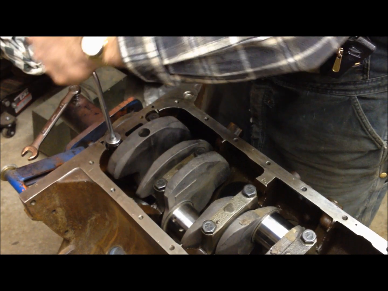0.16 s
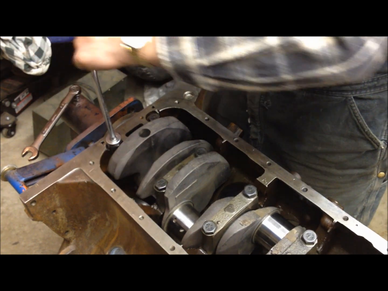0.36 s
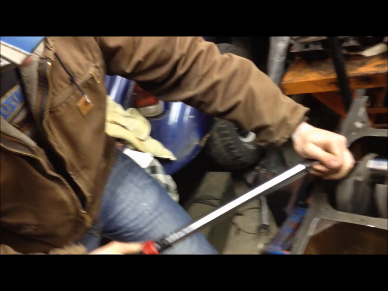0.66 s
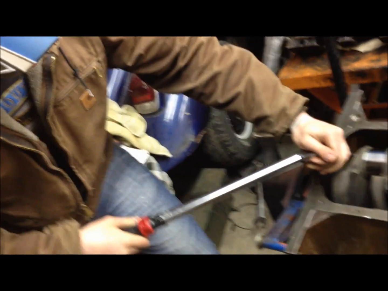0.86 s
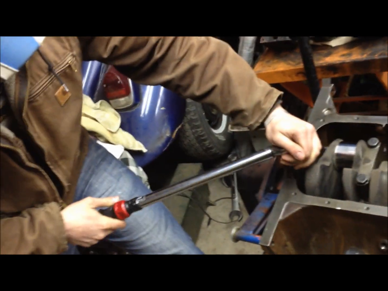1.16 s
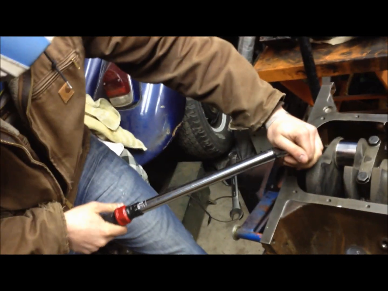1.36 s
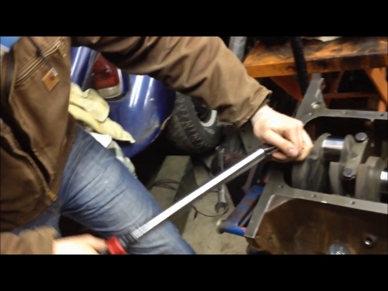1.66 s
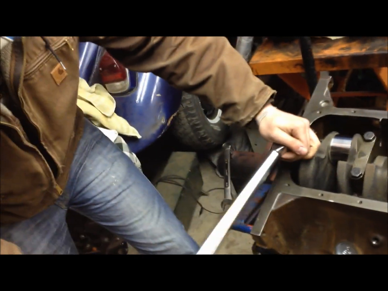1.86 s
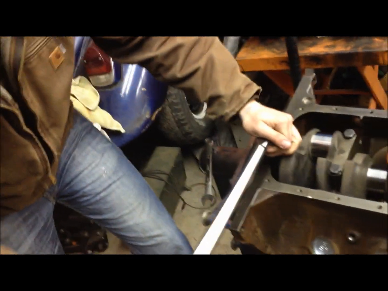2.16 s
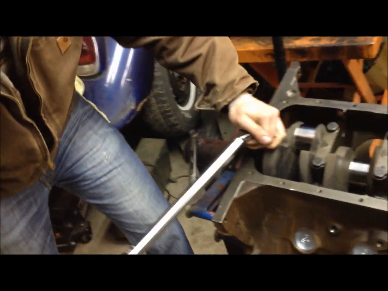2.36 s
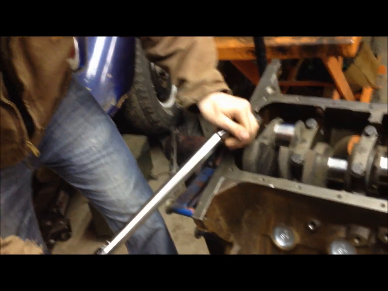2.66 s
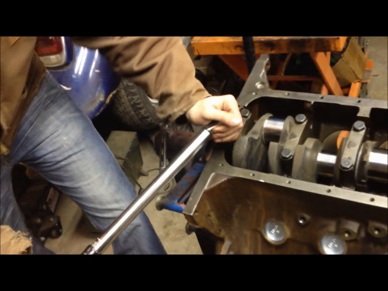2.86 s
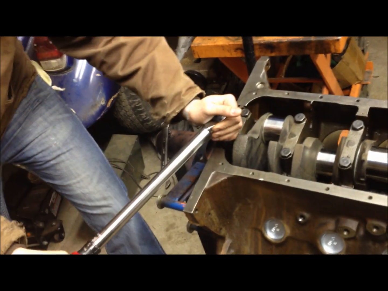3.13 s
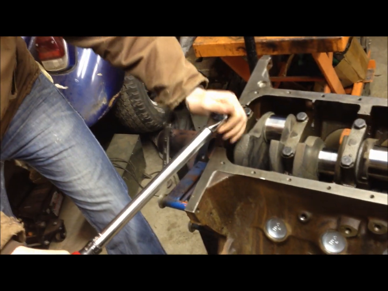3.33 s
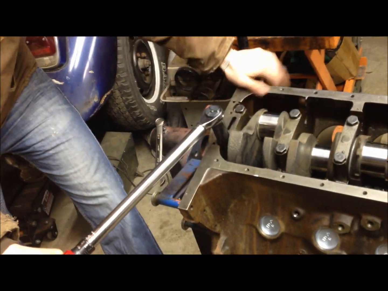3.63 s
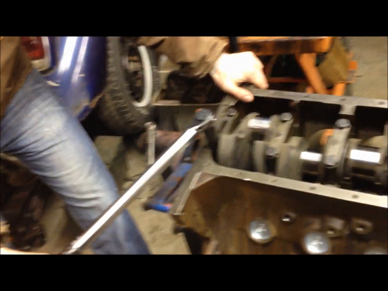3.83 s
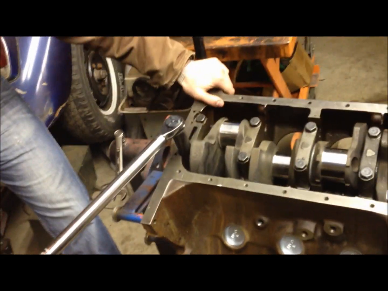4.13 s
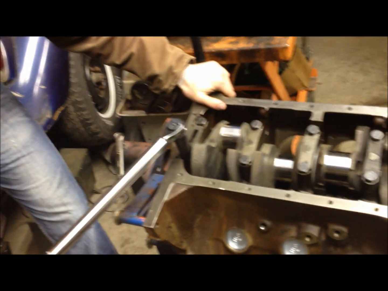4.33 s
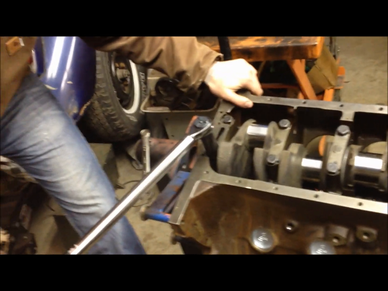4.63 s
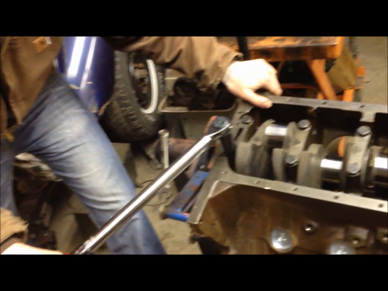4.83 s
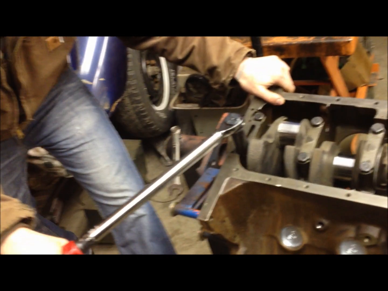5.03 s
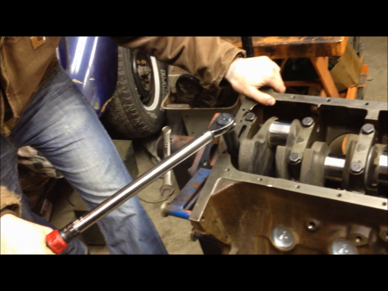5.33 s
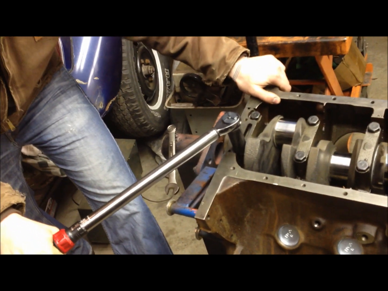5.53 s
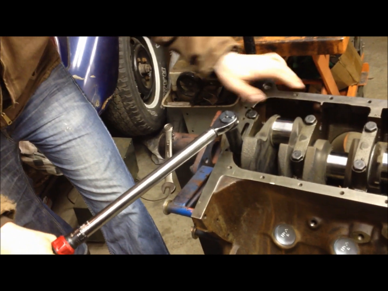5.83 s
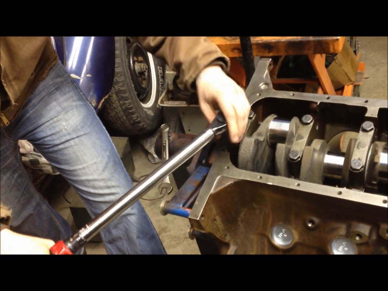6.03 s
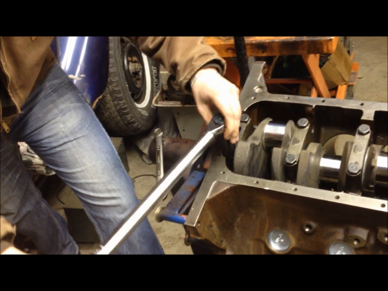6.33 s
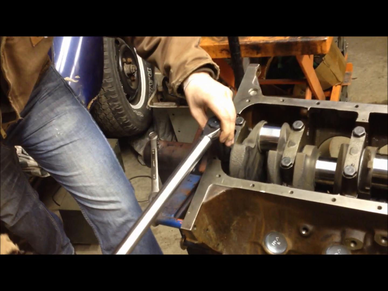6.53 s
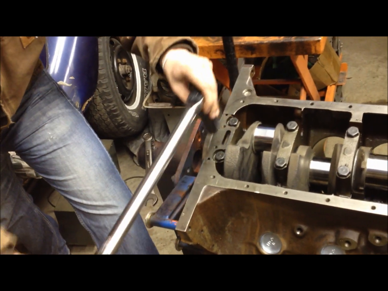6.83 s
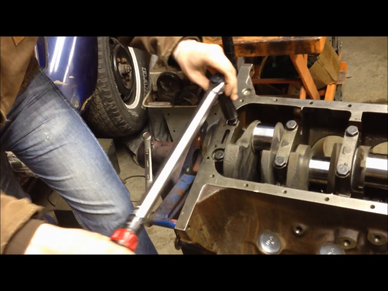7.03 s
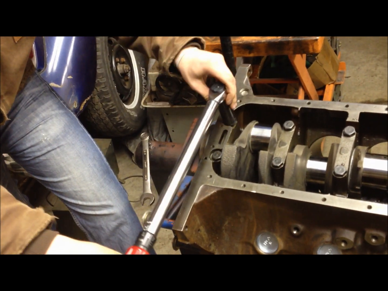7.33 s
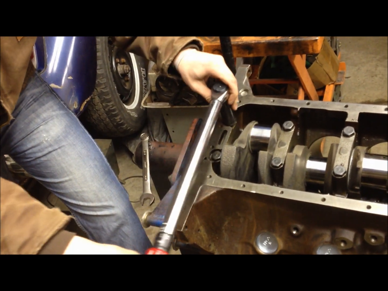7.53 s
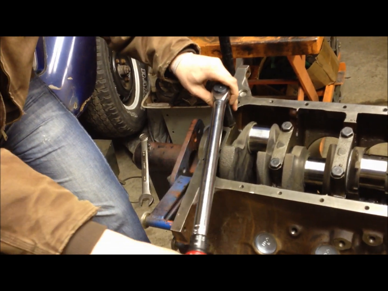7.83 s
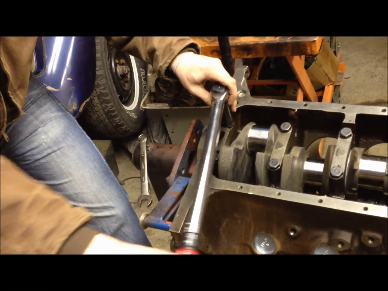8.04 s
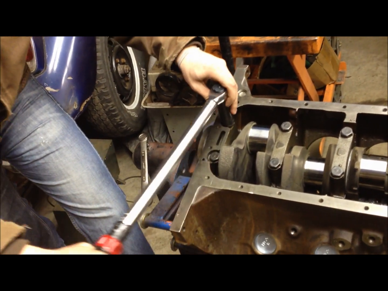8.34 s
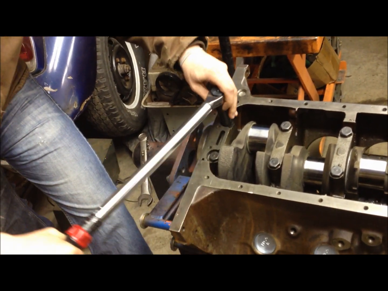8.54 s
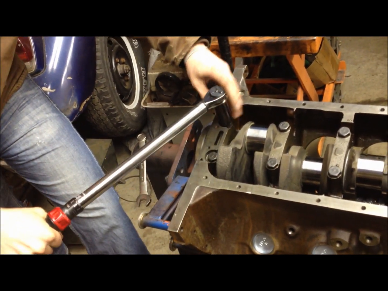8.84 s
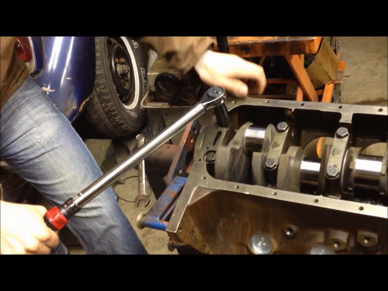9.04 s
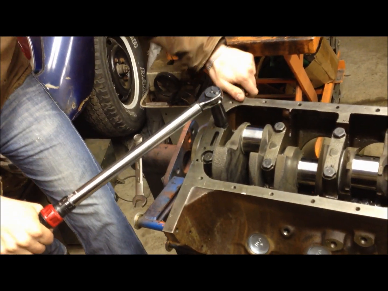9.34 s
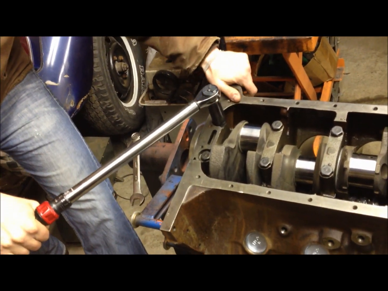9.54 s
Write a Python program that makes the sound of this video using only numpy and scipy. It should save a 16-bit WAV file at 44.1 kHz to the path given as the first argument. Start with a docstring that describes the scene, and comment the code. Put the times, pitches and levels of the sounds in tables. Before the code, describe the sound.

In a small garage, a torque wrench ratchets and knocks on a bare engine block, clicks loudly with a short ring, then clanks loose.

```python
"""Torque wrench on an engine block

A click-type torque wrench tightens bolts on a bare engine block in a small garage. Its blows are short
forces that excite damped modes, followed by scattered echoes and a diffuse tail: ratchet ticks, socket
clanks, dull knocks, and the sharp click of the wrench breaking over and snapping back. Work clothes
swish as noise that follows their speed. A rumble stops early; shaped air noise and sine hum follow it."""
import sys
import numpy as np
from scipy import signal
from scipy.fft import rfft, irfft
from scipy.io import wavfile
from scipy.ndimage import uniform_filter1d

SR = 44100
rng = np.random.default_rng(int(sys.argv[2]) if len(sys.argv) > 2 else 0)


def persist_wave(psi):
    """Save psi, clipped to +-1, as 16-bit WAV."""
    counts = np.round(np.clip(psi, -1, 1) * 32767).astype(np.int16)
    wavfile.write(sys.argv[1], SR, np.atleast_2d(counts).T)


N = 427329

# Rumble at the start, spectral shape: (f/Hz, level/dB)
RUMBLE_SPECTRUM = [(24, -50), (40, -33), (64, -24), (108, -1.5), (200, 2.5), (329, 0), (454, -6.5),
                   (1610, -15), (4680, -28.5), (11400, -33), (13600, -33), (15000, -29)]
# Still air, spectral shape: (f/Hz, level/dB)
AIR_SPECTRUM = [(30, -32.5), (80, -26.5), (160, -8.5), (300, -10.5), (600, -14.5), (1200, -14), (2000, -17),
                (3300, -19.5), (4500, -22.5), (7300, -20.5), (9500, -29), (13500, -26.5), (15500, -27)]
# Mains hum partials: (f/Hz, rms level/dB)
HUM_PARTIALS = [(120, -95), (241, -77.5), (360.5, -73.5), (480, -81), (721, -91.5)]
RUMBLE_DB, AIR_DB = -54.5, -65  # rms levels before the microphone
RUMBLE_END_S = .785

# Decay of the garage: (f/Hz, t60/s)
GARAGE_T60 = [(150, 0.42), (400, 0.74), (1040, 0.72), (2760, 0.72), (7280, 0.56), (13000, 0.27)]
# Strength of the garage's diffuse tail: (f/Hz, level/dB)
WALL_TONE = [(100, 2), (350, -1), (650, -1.5), (1000, 1.5), (2000, -6.5), (3300, -2.5), (5500, -5),
             (7500, -4), (13000, -2)]

# Ratchet pawl dropping over single teeth:
# (t/s, strength/dB, treble/dB, top/dB, resonance favoured by the tooth f/Hz)
PAWL_DROPS = [(.205, -31.5, 1, 23, 13500), (1.4814, -17, 1.5, 10, 5600), (1.7992, -5.5, 0.5, 7, 5380),
              (1.8728, -8.5, 2.5, 9.5, 4600), (1.9375, -0.5, -8, 5.5, 6100),
              (1.9986, -0.5, -3.5, 9.5, 5340), (2.0691, 0, 1, 6.5, 7540), (2.351, -33, 6, -7, 6000),
              (2.43, -19, -5, -16, 5000), (2.7136, 4.5, -1.5, -1, 3280), (3.205, -13.5, -7, 0, 7700),
              (3.363, -24, -2, 9, 6500), (6.244, -32, -1, 20, 7000), (6.3065, -18.5, -4.5, 9, 6890),
              (6.7746, 0, -3.5, 12.5, 5980)]
# Socket and wrench head against bolts and block:
# (t/s, strength/dB, bass/dB, treble/dB, top/dB, resonance favoured by the contact f/Hz, chatter time/s)
SOCKET_BLOWS = [(.9518, -10, 21.5, 2, 3.5, 900, 0.0039), (1.1133, -18, 1, -13, -25, 2300, 0.0067),
                (1.3257, -9.5, 4, -11.5, -49, 3100, 0.0075), (1.5301, 3, 6.5, -17, -9, 1320, 0.0018),
                (6.655, -13, -3, -35, -36, 1850, 0.022), (6.675, -12, 0, -14, -14, 1700, 0.015),
                (6.695, 3.5, -9, -6, -23, 2200, 0.0052), (7.246, 14.5, -9.5, -7, -5, 2400, 0.0058),
                (7.3453, 2.5, 3, 0.5, -1.5, 1790, .008), (7.403, -3.5, 5, -2.5, 4.5, 2420, 0.018),
                (7.456, -5.5, -10, -10, -14, 2177, 0.0094), (7.8738, -9.5, -3, -6, -54, 2120, 0.006),
                (8.6095, -3, -2, -13, -7, 2000, 0.0077), (8.6209, 16.5, 3, 0, 6, 3190, 0.0034)]
# Dull knocks against the block and its stand:
# (t/s, strength/dB, bass/dB, treble/dB, favoured resonance f/Hz, chatter time/s)
KNOCK_BLOWS = [(3.226, 12.5, -5, -12, 550, 0.0018), (3.231, 15.5, -11, -1.5, 860, 0.02),
               (3.32, 1.5, -9, -4, 940, .01), (4.106, -11, -10.5, -28, 900, 0.0038),
               (4.187, -20, -3.5, -14, 650, 0.0024), (4.2115, -4, -24, 3, 1770, .0016),
               (4.523, -14, -7.5, -27, 644, 0.01)]
# The wrench breaking over, then snapping back:
# (t/s, strength/dB, bass/dB, treble/dB, top/dB, resonance favoured by the contact f/Hz, chatter time/s)
WRENCH_BLOWS = [(5.388, 18.5, -2, 3, 9, 5760, .0017), (5.7533, 13, -5, -0.5, -5, 2070, 0.0031)]

# Colour of the crowded, quickly damped modes of each part: (f/Hz, level/dB)
PAWL_COLOUR = [(70, -39), (300, -29), (1200, -19.5), (1900, -8.5), (3300, -16), (4500, -5), (5600, -3.5),
               (7300, -8), (9500, -19), (14000, -27)]
SOCKET_COLOUR = [(50, -37.5), (100, -33.5), (150, -16.5), (250, -18), (400, -13), (600, -14), (1100, -2),
                 (1550, -0.5), (2000, 1), (3000, -0.5), (3800, -3), (4600, -7), (6500, -3.5), (7700, -6.5),
                 (8700, -15.5), (11500, -20), (14000, -20.5)]
KNOCK_COLOUR = [(60, -21), (120, -13), (200, 6.5), (330, 5), (550, 5), (900, -2.5), (1400, -7),
                (2200, -9.5), (3500, -18), (7000, -23.5), (13000, -43)]
WRENCH_COLOUR = [(90, -32), (250, -18.5), (400, -13.5), (620, -24.5), (850, -10.5), (1050, -11.5),
                 (1500, -14), (2200, -4.5), (3300, -7), (4600, -8.5), (5600, -7), (7250, -10),
                 (8300, -13.5), (10600, -20), (13000, -19.5)]
# Clear modes of each part that ring on: (f/Hz, relative level/dB, t60/s)
PAWL_RINGING = [(4950, -13, .2), (5400, 0, .01), (5980, -15, .25), (7300, -15, .15), (7620, -21, .25)]
SOCKET_RINGING = [(145, -24, .5), (255, -19, .45), (953, -22, .55), (1120, -15, .45), (1160, -9, .3),
                  (1239, -12, .3), (1392, -16, .4), (1900, -12, .5), (2007, -4, .22), (2526, -4, .15),
                  (2835, -10, .4), (2901, 7.5, .15), (3220, -12, .45), (3290, -10, .6), (3366, -9, .45),
                  (3512, -9, .35), (3788, -6, .25), (3942, -8, .2), (7779, -21, .3)]
KNOCK_RINGING = [(245, 0, .3), (298, 8, .3), (565, -2, .25), (649, 2, .3), (790, -6, .4), (960, -4, .45),
                 (1385, -11, .45)]
WRENCH_RINGING = [(955, -17, .45), (1020, -13.5, .5), (1098, -13, .5), (1180, -17, .4), (2150, 11, .022),
                  (2630, 2, .03), (3330, -19, .6), (5445, 11, .011), (5655, 12, .011), (7251, 14, .011)]

# Jacket and jeans rubbing, before a common trim: (t of top speed/s, level/dB, swell time/s, fade time/s)
CLOTH_RUBS = [(2.42, -59, 0.086, 0.071), (2.632, -45.5, 0.014, 0.029), (2.785, -37, 0.0058, 0.013),
              (2.826, -43.5, 0.02, 0.06), (3.05, -65.5, 0.13, 0.24), (3.615, -60, 0.028, .022),
              (3.714, -59.5, 0.0069, 0.017), (3.8, -56.5, 0.036, .025), (4.048, -65, 0.069, 0.03),
              (4.46, -58, 0.36, 0.11), (4.718, -46.5, .01, 0.046), (5.1, -57.5, .005, 0.24),
              (5.222, -47, 0.028, 0.025), (6.381, -70, 0.048, .09), (9.201, -73, 0.12, 0.24)]
# Spectral shape of the rubbing cloth: (f/Hz, level/dB per Hz)
CLOTH_SPECTRUM = [(100, -27.5), (250, -4), (800, -6.5), (1500, -8), (3000, -8.5), (4300, -11.5),
                  (7200, -4.5), (9500, -13.5), (13000, -14.5), (15500, -14)]

NEAR_DB = -4.5  # scatter of a blow from block, bench and floor
PAWL_BASS_DB = -0.5
PAWL_CHATTER_S, PAWL_DOUBLING_DB = 0.0015, 40  # chatter time at 0 dB, and the dB that double it
SPLIT_HZ, NEIGHBOUR = 16, .5  # widest distance of a mode's neighbours, and their relative amplitude
RUB_SMOOTH_S = .012
EDGE_HZ = 15300  # upper band limit


def gain_of(db):
    """Level definition: decibels to amplitude."""
    return 10 ** (np.asarray(db) / 20)


def evened(x):
    """Power normalisation: scales to rms 1."""
    return x / np.sqrt(np.mean(x ** 2) + 1e-20)


def read(points, hz):
    """Logarithmic pitch scale: joins (f/Hz, value) points linearly in log frequency."""
    f, value = np.transpose(points)
    return np.interp(np.log(hz + 1), np.log(f + 1), value)


def add(mix, s, sound):
    """Superposition: mixes a sound in at time s."""
    part = mix[round(s * SR):][:len(sound)]
    part += sound[:len(part)]


def shaped(x, spectrum):
    """Spectral filtering: gives a long noise a spectrum, at rms 1."""
    gain = gain_of(read(spectrum, np.fft.rfftfreq(N, 1 / SR)))
    return evened(irfft(rfft(x) * gain, N))


def causal(gain):
    """Causality: the minimum-phase response with this gain, so nothing sounds before the blow."""
    log_gain = np.log(np.maximum(gain, 1e-6))
    circle = np.concatenate([log_gain, log_gain[-2:0:-1]])
    return np.exp(np.conj(signal.hilbert(circle)))[:len(gain)]


def background(waver_rad=.2):
    """Stationary noise and phase-wandering sines: a rumble stops short, then still air and hum sound."""
    t = np.arange(N) / SR
    rumble = gain_of(RUMBLE_DB) * shaped(rng.standard_normal(N), RUMBLE_SPECTRUM)
    air = gain_of(AIR_DB) * shaped(rng.standard_normal(N), AIR_SPECTRUM)
    hum = np.zeros(N)
    for hz, db in HUM_PARTIALS:
        drift = np.interp(t, np.linspace(0, t[-1], num=60), rng.standard_normal(size=60))
        hum += np.sqrt(2) * gain_of(db) * np.sin(2 * np.pi * hz * t + waver_rad * drift)
    # a crossfade of 200 samples
    rumble_on = uniform_filter1d((t < RUMBLE_END_S) * 1., size=200)
    return rumble_on * rumble + (1 - rumble_on) * (air + hum)


def chatter(seconds, contact, t):
    """Repeated impact: a first touch, then rattling that builds and dies; the spectrum is evened out."""
    age = t / max(seconds, 1e-4)
    force = rng.standard_normal(len(t)) * np.exp(-age) * (1 - np.exp(-3 * age))
    force /= np.linalg.norm(force)
    force[0] += contact
    spectrum = rfft(force)
    local_power = uniform_filter1d(abs(spectrum) ** 2, size=300)
    return spectrum * causal(1 / np.sqrt(local_power))


def ringing(modes, t):
    """Mode splitting: clamped joints give each mode two weaker, close neighbours that beat against it."""
    out = np.zeros(len(t))
    for hz, db, t60 in modes:
        split = min(SPLIT_HZ, hz / 20) * rng.uniform(-1, 1, (2, 1))
        neighbours = np.cos(2 * np.pi * (hz + split) * t)
        beating = np.cos(2 * np.pi * hz * t) + NEIGHBOUR * (neighbours[0] - neighbours[1])
        out += gain_of(db - 60 * t / t60) * beating * rng.choice([-1, 1])
    return out


def garage(t, early_db, tail_db, early_s=0.013, build_s=0.01195):
    """Room reflection: sparse scatter from block, bench and floor, then a diffuse tail, drawn anew each call."""
    near, far = rng.standard_normal((2, len(t)))
    # about 3000 echoes per second, none in the first 3 ms
    near *= (rng.random(len(t)) < 3000 / SR) * (t > .003) * np.exp(-t / early_s)
    hz, at, z = signal.stft(far, SR, nperseg=256)
    decay_db = 60 * at / read(GARAGE_T60, hz)[:, None]
    z *= gain_of(read(WALL_TONE, hz)[:, None] - decay_db)
    tail = signal.istft(z, SR, nperseg=256)[1][:len(t)] * (1 - np.exp(-t / build_s))
    return gain_of(early_db) * near / np.linalg.norm(near) + gain_of(tail_db) * tail


def strikes(hits, tone, modes, ring_db, contact, favour_db, tail_db, favour_width=0.09, size=32768):
    """Modal excitation: a blow drives crowded modes, a few clear modes ring on, the room answers both.

    ring_db: energy of the ring against the clack; contact: first touch beside rattling of unit energy;
    favour_width: half-width of the favoured region in log frequency.
    """
    t, hz, out = np.arange(size) / SR, np.fft.rfftfreq(size, 1 / SR), np.zeros(N)
    body = causal(gain_of(read(tone, hz)))
    for s, db, bass_db, treble_db, top_db, favoured_hz, chatter_s in hits:
        ring = rfft(ringing(modes, t))
        ring *= gain_of(ring_db) * np.linalg.norm(body) / np.linalg.norm(ring)
        # where the blow lands favours one region of modes; the room averages over directions and halves this
        place = favour_db / (1 + (np.log((hz + 1) / favoured_hz) / favour_width) ** 2)
        direct = (body * chatter(chatter_s, contact, t) + ring) * causal(gain_of(place))
        room = rfft(garage(t, NEAR_DB, tail_db))
        echo = (body + ring / 2) * room * causal(gain_of(place / 2))
        # how hard the contact is tilts the colour
        hardness = read([(300, bass_db), (2000, 0), (6000, treble_db), (12000, top_db)], hz)
        add(out, s, irfft((direct + echo) * causal(gain_of(db + hardness))))
    return out


def ratchet():
    """Repeated small impact: every tooth is the same kind of blow; a harder drop chatters longer."""
    hits = []
    for s, db, treble_db, top_db, hz in PAWL_DROPS:
        chatter_s = PAWL_CHATTER_S * 2 ** (db / PAWL_DOUBLING_DB)
        hits.append((s, db, PAWL_BASS_DB, treble_db, top_db, hz, chatter_s))
    return strikes(hits, PAWL_COLOUR, PAWL_RINGING, ring_db=-12, contact=.15,
                   favour_db=11, tail_db=-33.5, favour_width=0.065)


def socket():
    """Metal impact: socket and wrench head clank on bolts and block, whose modes ring on."""
    return strikes(SOCKET_BLOWS, SOCKET_COLOUR, SOCKET_RINGING, ring_db=-5.5, contact=.1,
                   favour_db=4.5, tail_db=-33)


def clothes(trim_db=-1, grain_db=4.0, tail_db=-38):
    """Stick-slip friction: countless fibres catch and slip while the cloth moves."""
    t, speed = np.arange(N) / SR, np.zeros(N)
    for s, db, swell_s, fade_s in CLOTH_RUBS:
        # each movement gathers speed, then dies away
        speed += gain_of(db) * np.exp(-np.maximum((s - t) / swell_s, (t - s) / fade_s))
    speed = uniform_filter1d(speed, size=round(RUB_SMOOTH_S * SR))
    # random strengths make some slips stand out
    slips = rng.standard_normal(N) * gain_of(grain_db * np.minimum(rng.exponential(1, N), 5))
    swish = gain_of(trim_db) * speed * shaped(slips, CLOTH_SPECTRUM)
    return swish + signal.fftconvolve(swish, garage(t[:SR], -14, tail_db))[:N]


def dull_knocks():
    """Soft impact: one setting governs the whole treble of each knock."""
    hits = [(s, db, bass_db, treble_db, treble_db, hz, chatter_s)
            for s, db, bass_db, treble_db, hz, chatter_s in KNOCK_BLOWS]
    return strikes(hits, KNOCK_COLOUR, KNOCK_RINGING, ring_db=-6, contact=.35,
                   favour_db=7, tail_db=-30.5)


def wrench():
    """Sudden release: the mechanism breaks over and snaps back, each a blow to the wrench's modes."""
    return strikes(WRENCH_BLOWS, WRENCH_COLOUR, WRENCH_RINGING, ring_db=-5, contact=.15,
                   favour_db=5.5, tail_db=-32.5, favour_width=0.1)


def scene():
    """Superposition: tool sounds, knocks and clothes over the background."""
    return (background() + ratchet() + socket() + clothes() + dull_knocks() + wrench())[None]


def record(dry):
    """Band limiting: the microphone sheds deep bass; then a low-pass sets the upper edge."""
    thin = signal.sosfilt(signal.butter(2, 105, "highpass", fs=SR, output="sos"), dry)
    low_pass = signal.firwin(301, EDGE_HZ, window=("kaiser", 8), fs=SR)
    return signal.oaconvolve(thin, low_pass[None], "same")


dry = scene()
out = record(dry)
persist_wave(out)
```